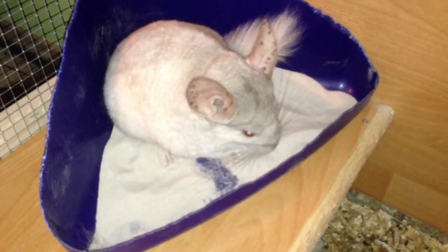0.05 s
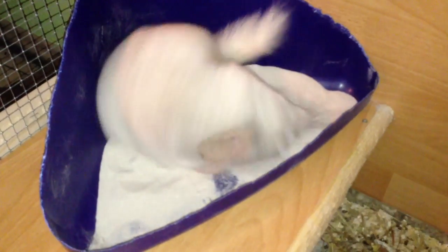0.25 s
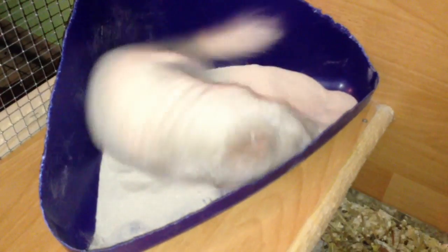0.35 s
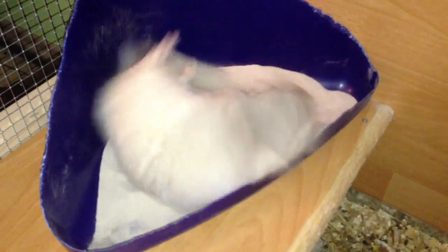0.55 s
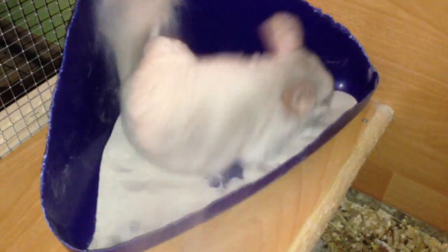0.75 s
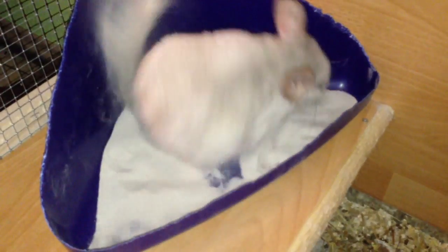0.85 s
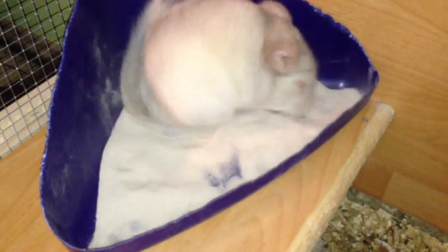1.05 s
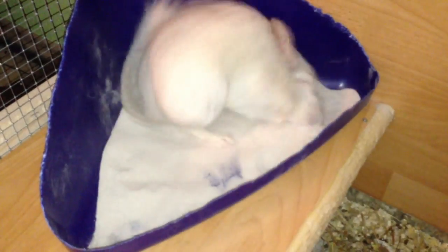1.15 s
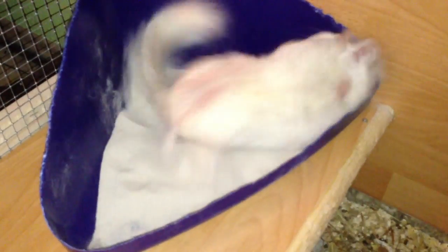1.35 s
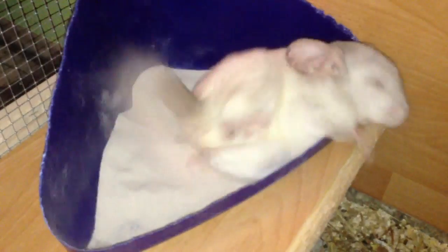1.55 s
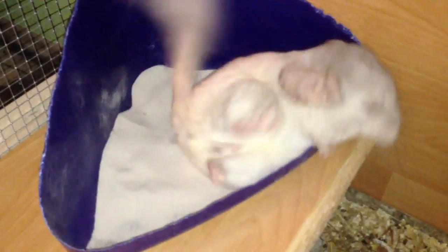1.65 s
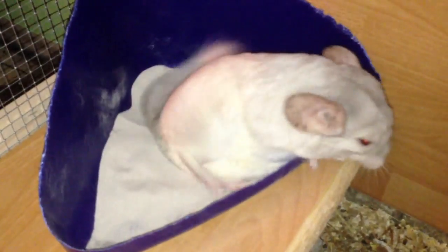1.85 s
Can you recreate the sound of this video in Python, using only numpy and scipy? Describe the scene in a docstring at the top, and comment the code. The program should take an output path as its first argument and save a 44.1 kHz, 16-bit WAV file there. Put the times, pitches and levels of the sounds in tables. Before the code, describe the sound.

A chinchilla dust-bathes in a plastic tub: a burst of gritty scraping, then quick scuffs, claw ticks and dull knocks, fading to faint rustles; close microphone in a small quiet room.

```python
"""A chinchilla rolls in a plastic tub of fine dust, close to the microphone in a small, quiet room.
Fur and paws sweep the dust: gritty noise is scraped through the tub's wall resonances, with a low drag
on its floor, sprayed grains and hiss. Body and feet knock softly on the tub as decaying modes, claws
tick as short clusters of partials, two rubs sing in narrow bands and the rolling body rumbles.
A short, faint room tail and a steady noise floor lie behind."""
import sys
import numpy as np
from scipy import signal
from scipy.fft import rfft, irfft, next_fast_len
from scipy.io import wavfile
from scipy.ndimage import map_coordinates

SR = 44100
rng = np.random.default_rng(int(sys.argv[2]) if len(sys.argv) > 2 else 0)


def put_to_file(sound):
    """Save the sound as 16-bit audio at rate SR, in the file named by the first command-line argument."""
    columns = np.atleast_2d(sound).T  # one column per channel
    safe = np.clip(columns, -1, 1)
    whole_steps = np.round(safe * 32767)
    wavfile.write(sys.argv[1], SR, whole_steps.astype(np.int16))


N = 83790  # samples: 1.9 s

# sweeps through the dust: full_speed_s, rise_s, hold_s, level_db, and relative to that level:
# drag_db on the tub floor, hiss_db of the fine dust, bright_db tilt of the scrape
DUST_STROKES = [(0.205, 0.03, 0.026, -49.5, -17.5, -7, -4),
                (0.236, 0.0055, 0.0056, -44.5, -14.5, -7.5, -0.5),
                (0.28, 0.013, 0.0034, -34.5, -11, -10, -3.5), (0.299, 0.0092, 0.0099, -38, -9, -14, -5),
                (0.32, .008, 0.0087, -41, -9, -7.5, -5), (0.341, 0.017, 0.04, -44, -15, -10.5, -0.5),
                (0.36, 0.0037, 0.0074, -48, -27, -1.5, 1), (0.397, 0.0023, 0.0024, -38.5, -6, -14, -1.5),
                (0.429, 0.079, 0.1, -62.5, -5, 2, 1), (0.582, 0.013, 0.0073, -62.5, -1, -3.5, -3),
                (0.632, 0.046, 0.016, -56.5, -7, -1.5, -1), (0.67, 0.017, 0.017, -54, -11.5, -4.5, -4),
                (.72, 0.037, .125, -62.5, -11.5, -1, -1), (0.871, 0.048, 0.037, -49, -25, -7, -2),
                (0.91, .008, 0.0048, -37.5, -12, -15.5, -3), (0.963, 0.024, .03, -60.5, -15, -4, -1),
                (0.995, 0.019, 0.017, -46, -26, -7.5, -3.5), (1.029, 0.0089, 0.0029, -44, -11, -5.5, 3.5),
                (1.042, .004, 0.0025, -43.5, -14.5, -13, 4), (1.068, 0.017, 0.0073, -42, -19, -11, 3),
                (1.085, 0.0042, 0.0066, -45, -20, -8, -1.5), (1.159, 0.0034, 0.016, -53.5, -21, -5.5, -3),
                (1.199, 0.014, 0.0047, -46, -12.5, -8, -1.5), (1.228, .02, 0.14, -52.5, -15.5, -4.5, -3),
                (1.288, 0.041, 0.027, -49.5, -20, -5, 0.5), (1.349, 0.01, 0.017, -45.5, -4.5, -10, -4.5),
                (1.397, 0.037, 0.016, -43, -15.5, -9.5, -1), (1.534, 0.06, 0.061, -63.5, -5.5, -2, 1),
                (1.623, 0.016, 0.13, -68, -4.5, -2.5, -1), (1.774, 0.0091, .008, -63.5, -7, -5, -2),
                (1.825, 0.039, 0.09, -67, -5, -1.5, -1.5)]


def amp(db):
    """Decibels to gain."""
    return 10 ** (np.asarray(db) / 20)


def unit(x):
    """x at rms 1."""
    return x / np.sqrt(np.mean(x ** 2) + 1e-20)


def along(points, hz):
    """(Hz, value) points read on a log frequency axis."""
    f, v = np.transpose(points)
    return np.interp(np.log(hz + 1), np.log(f + 1), v)


def filtered(x, response):
    """x times a response of frequency, padded so that the ringing does not wrap round."""
    m = next_fast_len(N + SR // 2)
    spectrum = rfft(x, m) * response(np.fft.rfftfreq(m, 1 / SR))
    return irfft(spectrum, m)[:N]


def coloured(x, points):
    """x shaped by (Hz, dB) points, at rms 1."""
    return unit(filtered(x, lambda hz: amp(along(points, hz))))


def highpassed(x, order, cut_hz):
    """x with the range below cut_hz rolled off."""
    return signal.sosfilt(signal.butter(order, cut_hz, "highpass", fs=SR, output="sos"), x)


def wobble(rate):
    """A smooth random curve, rate knots a second."""
    knots = rng.standard_normal(2048)
    return map_coordinates(knots, [np.arange(N) * rate / SR])


def add(track, s, sound):
    """Mix a sound into the track at time s."""
    part = track[max(round(s * SR), 0):][:len(sound)]
    part += sound[:len(part)]


def background():
    """Steady coloured noise: the quiet floor behind the tub."""
    # spectrum of the floor: pitch_hz, level_db
    floor_colour = [(25, -20), (60, -29.5), (120, 0), (180, -8), (260, -16.5), (400, -24), (700, -15),
                    (1200, -16), (2500, -17), (6000, -18), (15000, -19)]
    return amp(-67) * coloured(rng.standard_normal(N), floor_colour)


def room(x):
    """The room's answer, 5 ms late: a noise tail whose decay time depends on frequency, treble dying first."""
    # decay times of the room: pitch_hz, t60_s
    room_decay = [(150, 0.12), (1000, 0.58), (4000, 0.37), (14000, 0.054)]
    hz, t, z = signal.stft(rng.standard_normal(SR // 2), SR, nperseg=256)
    decay = amp(-60 * t / along(room_decay, hz)[:, None])
    tail = signal.istft(z * decay, SR, nperseg=256)[1]
    delayed = np.pad(x, (SR // 200, 0))
    return signal.fftconvolve(delayed, tail / np.linalg.norm(tail))[:N]


def rolling():
    """The furry body rumbles on the tub floor: low noise that follows its shifting weight."""
    # the body's weight on the floor: time_s, level_db
    weight_shifts = [(0, -72.5), (.11, -74), (.135, -71.5), (.16, -69.5), (.3, -70), (.37, -70), (.41, -57),
                     (.5, -60.5), (.59, -69.5), (.67, -63), (.83, -74), (.88, -61.5), (.97, -67),
                     (1.04, -61), (1.1, -67), (1.17, -63), (1.32, -71), (1.38, -52), (1.47, -66),
                     (1.76, -71), (1.83, -64), (1.9, -66.5)]
    # spectrum of the rumble: pitch_hz, level_db
    rumble_colour = [(25, -60), (60, -6), (120, -2.5), (190, 4.5), (250, 5), (340, 2.5), (450, -6),
                     (800, -4.5), (2000, -56)]
    level_db = np.interp(np.arange(N) / SR, *np.transpose(weight_shifts))
    return amp(level_db) * coloured(rng.standard_normal(N), rumble_colour)


def claws():
    """A claw tick on the plastic is a cluster of three very short partials, weak in the bass."""
    # claw ticks: start_s, level_db, pitch_hz of the middle of the cluster
    claw_ticks = [(.3346, -20.5, 2450), (.3615, -29, 3000), (.3972, -23.5, 2900), (.638, -38, 2500),
                  (.9098, -27, 3600), (.9115, -24.5, 2000), (1.031, -27, 3900), (1.081, -19, 3300),
                  (1.865, -44, 1600), (1.889, -43, 1150), (1.892, -45, 2300)]
    t60_s, attack_s = 0.008, 0.00015
    spread = 0.2  # log-frequency step between partials
    low_cut = 0.82  # share of a tick's pitch below which it radiates little
    out, t = np.zeros(N), np.arange(SR // 20) / SR
    for s, db, hz in claw_ticks:
        steps = np.array([[-1], [0], [1]]) + rng.uniform(-1.1, 1, (3, 1)) / 10
        partials_hz = hz * np.exp(spread * steps)
        cluster = np.sin(2 * np.pi * partials_hz * t).sum(axis=0) / 2
        envelope = amp(db - 60 * t / t60_s) * (1 - np.exp(-t / attack_s))
        add(out, s, highpassed(envelope * cluster, 2, low_cut * hz))
    return out


def knocks():
    """A soft blow flexes the struck spot briefly, with a dull noise slap and a ring of the whole tub."""
    # soft blows: start_s, level_db, pitch_hz and t60_s of the struck spot, and relative to the level:
    # ring_db of the whole tub, slap_db
    blows = [(.131, -56, 170, 0.071, -16, -28), (0.3974, -22.5, 488, 0.024, -23.5, -20),
             (.462, -45.5, 387, 0.043, -21, -12), (.4805, -33.5, 645, 0.013, -16.5, -8.5),
             (0.6363, -33.5, 676, 0.016, -23, -10.5), (0.667, -45, 540, 0.041, -16, -11),
             (.853, -48, 485, .025, -21, -19), (0.877, -48, 140, 0.043, -27, -19),
             (.9105, -30, 790, 0.019, -28, -18), (0.9329, -32.5, 710, 0.0088, -21.5, -13),
             (1.199, -47, 770, 0.02, -28, -13), (1.342, -39, 505, .03, -20, -18),
             (1.3504, -22.5, 674, 0.017, -14, -11.5), (1.356, -37.5, 220, 0.027, -17, -12),
             (1.404, -41, 594, 0.04, -7.5, -24), (1.414, -37, 546, 0.017, -22, -18),
             (1.5215, -39, 316, 0.03, -16.5, -42), (1.538, -46, 250, 0.065, -18, -27),
             (1.603, -43.5, 560, 0.019, -21, -9), (1.638, -47, 586, 0.019, -27, -24),
             (1.68, -38.5, 550, 0.017, -38, -14), (1.71, -50, 534, 0.017, -8, -18),
             (1.777, -50, 385, 0.026, -4, -3), (1.823, -50.5, 250, 0.044, -13, -18)]
    # the tub's low modes: pitch_hz, level_db before a random change at each blow, t60_s
    tub_modes = [(121, -16.5, .1), (201, -6.5, 0.087), (327, -3, 0.078), (389, -11.5, 0.17),
                 (563, -4, 0.074), (640.5, -2, 0.064), (855, -20, 0.038), (1255, -7.5, 0.051)]
    # spectrum of the slap: pitch_hz, level_db
    slap_colour = [(40, -45), (100, -13), (400, -8), (1000, -1), (2000, -9), (5000, -18), (15000, -56)]
    attack_s, slap_t60_s = 0.0014, 0.021
    mode_spread_db = 2.3
    out, t = np.zeros(N), np.arange(SR // 4) / SR
    contact = coloured(rng.standard_normal(N), slap_colour)
    for s, db, hz, t60, ring_db, slap_db in blows:
        flex = np.sin(2 * np.pi * hz * t) * amp(-60 * t / t60)
        ring = np.zeros(len(t))
        for mode_hz, mode_db, mode_t60 in tub_modes:
            decay = amp(mode_db + rng.normal(0, mode_spread_db) - 60 * t / mode_t60)
            ring += decay * np.sin(2 * np.pi * mode_hz * t)
        # each slap is a fresh stretch of the contact noise
        stretch = np.roll(contact, rng.integers(N))[:len(t)]
        slap = stretch * amp(slap_db - 60 * t / slap_t60_s)
        attack = 1 - np.exp(-t / attack_s)
        add(out, s, amp(db) * (flex + amp(ring_db) * ring + slap) * attack)
    return out


def rubs():
    """Fur rubbing one wall makes it sing: noise in one narrow resonance that swells and fades."""
    # steady rubs: middle_s, half_length_s, level_db, pitch_hz, width_hz
    wall_rubs = [(0.22, 0.026, -52, 1648, 90), (1.053, 0.056, -60, 362, 45)]
    t, out = np.arange(N) / SR, np.zeros(N)
    for s, half, db, hz, width in wall_rubs:
        resonance = lambda f: 1 / (1 + (2 * (f - hz) / width) ** 2)
        band = unit(filtered(rng.standard_normal(N), resonance))
        out += amp(db) / (1 + ((t - s) / half) ** 4) * band
    return out


def grit():
    """Tiny slips of uneven size over smooth rubbing noise."""
    slips_per_s, spread_db = 3300, 3
    slip_share = 0.37  # of the power
    slipping = rng.random(N) < slips_per_s / SR
    sizes = amp(spread_db * np.minimum(rng.exponential(size=N), 4))
    slips = slipping * rng.choice([-1, 1], N) * sizes
    return np.sqrt(slip_share) * unit(slips) + np.sqrt(1 - slip_share) * rng.standard_normal(N)


def crunch():
    """Clumps crunch under the body: a random stream of short pitched bursts of uneven size, at rms 1."""
    bursts_per_s, middle_hz, pitch_spread = 600, 2795, 0.31
    cycles = 19.6  # in which a burst falls by 60 dB
    size_db = 2.5  # mean of the exponential spread before its cap
    draws, t = rng.random((2000, 3)), np.arange(SR // 40) / SR
    times = np.cumsum(-np.log(1 - draws[:, 0])) / bursts_per_s
    sizes = amp(size_db * np.minimum(-np.log(1 - draws[:, 1]), 3))
    pitch_steps = np.log((draws[:, 2] + 0.05) / (1.05 - draws[:, 2])) / 2
    pitches = middle_hz * np.exp(pitch_spread * pitch_steps)
    out = np.zeros(N)
    for s, size, hz in zip(times, sizes, pitches):
        if s < N / SR:
            envelope = amp(-60 * hz * t / cycles) * (1 - np.exp(-hz * t))
            add(out, s, size * np.sin(2 * np.pi * hz * t) * envelope)
    return unit(out)


def sweeps(extra_db, rise_db=15.5, release_db_per_s=579):
    """The strokes' joint envelope: each gains rise_db over its rise time, holds and dies away; powers add."""
    t, power = np.arange(N) / SR, np.zeros(N)
    for (s, rise, hold, db, *_), extra in zip(DUST_STROKES, extra_db):
        before_db = rise_db * np.maximum(s - t, 0) / rise
        after_db = release_db_per_s * np.maximum(t - s - hold, 0)
        power += amp(db + extra - before_db - after_db) ** 2
    return np.sqrt(power)


def tub_walls(f):
    """Response of the tub's walls: the direct sound plus a sum of resonances."""
    # wall resonances: pitch_hz, width_hz, level_db before the common gain below
    wall_modes = [(1672, 33, -2.5), (1812, 11, -4.5), (1930, 13, -5), (2102, 17, -8), (2258, 106, -1),
                  (2360, 27, -3.5), (2532, 33, 4.5), (2677, 18, 2), (2965, 28, 1), (3120, 31, -8),
                  (3380, 37, -2), (3930, 38, -0.5)]
    ringing = sum(amp(db) * 1j * f * w / (c * c - f * f + 1j * f * w) for c, w, db in wall_modes)
    return 1 + amp(3) * ringing


def scrape(bright_db):
    """Grit and crunching clumps ring the walls; each stroke tilts the balance of dull and bright parts."""
    # spectrum of the scrape: pitch_hz, level_db
    scrape_colour = [(200, -45), (900, -4.5), (1400, -9), (1700, 4.5), (2400, 2), (3400, 5), (4300, 3),
                     (5200, -8), (8000, -13.5), (15000, -70)]
    split_hz = 1950
    rub = coloured(filtered(grit() + amp(-15) * crunch(), tub_walls), scrape_colour)
    dull = filtered(rub, lambda hz: 1 / (1 + (hz / split_hz) ** 4))
    tilted = dull * sweeps(-bright_db) + (rub - dull) * sweeps(bright_db)
    return tilted * amp(0.77 * wobble(130))  # the level flutters slightly


def drag(drag_db):
    """Strokes drag along the tub floor: low grit with a slightly uneven level."""
    # spectrum of the drag: pitch_hz, level_db
    drag_colour = [(60, -42), (150, -13), (330, -2), (550, 4), (750, -6), (900, 2.5), (1080, -9), (1250, 1),
                   (1700, -9), (4000, -47)]
    return coloured(grit(), drag_colour) * sweeps(drag_db) * amp(1.4 * wobble(80))


def thrown_dust(hiss_db):
    """Thrown dust hisses, and the harder the stroke the more sand sprays against the walls."""
    # spectrum of the hiss: pitch_hz, level_db
    hiss_colour = [(1000, -20.5), (3000, -3.5), (5500, -1), (8000, -3), (11000, -6.5), (15000, -9)]
    # spectrum of the spray: pitch_hz, level_db
    spray_colour = [(2500, -35), (4400, 1.5), (5400, 0.5), (6400, -2.5), (8000, -9.5), (11000, -18),
                    (15000, -18)]
    spray_db, spray_growth = -44.5, 1.67  # level at the peak of the thrown dust; dB per dB of it
    # swells and fades more gently than the scrape
    thrown = sweeps(hiss_db, rise_db=13, release_db_per_s=328)
    spray = amp(spray_db) * coloured(grit(), spray_colour) * (thrown / thrown.max()) ** spray_growth
    return spray + coloured(rng.standard_normal(N), hiss_colour) * thrown


def dust():
    """Each stroke scrapes the ringing walls, drags on the floor, sprays sand and throws up hissing dust."""
    *_, drag_db, hiss_db, bright_db = np.transpose(DUST_STROKES)
    return scrape(bright_db) + drag(drag_db) + thrown_dust(hiss_db)


def scene():
    """The dust bath, the room's faint answer and a quiet background."""
    hits = highpassed(knocks() + claws(), 3, 102)  # a small tub radiates little bass
    bath = dust() + hits + rubs() + rolling()
    return (bath + amp(-20.5) * room(bath) + background())[None]


def record(dry):
    """The microphone's track keeps nothing above its band limit."""
    top_hz = 15300
    return filtered(dry[0], lambda hz: hz < top_hz)[None]


dry = scene()
out = record(dry)
put_to_file(out)
```